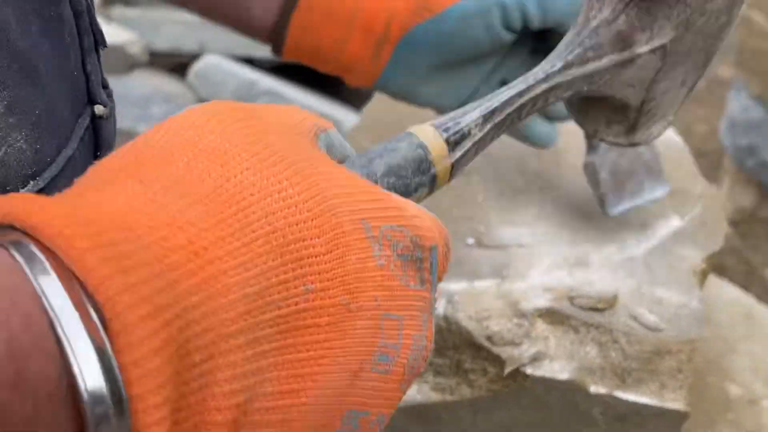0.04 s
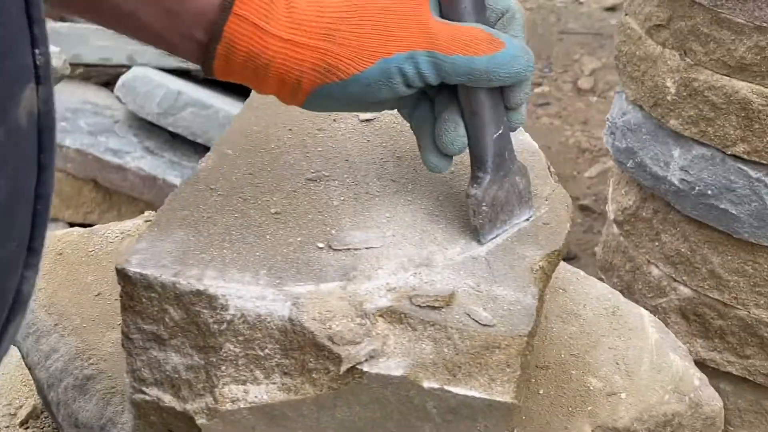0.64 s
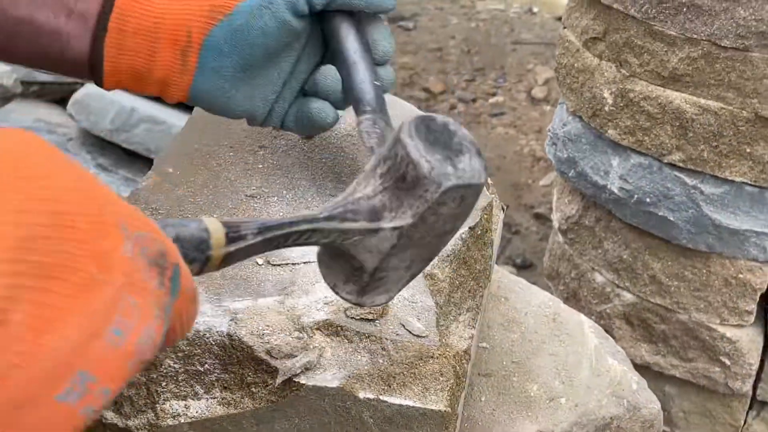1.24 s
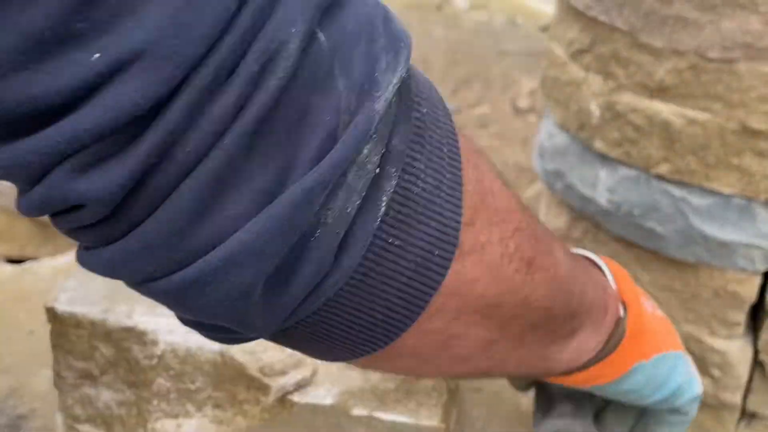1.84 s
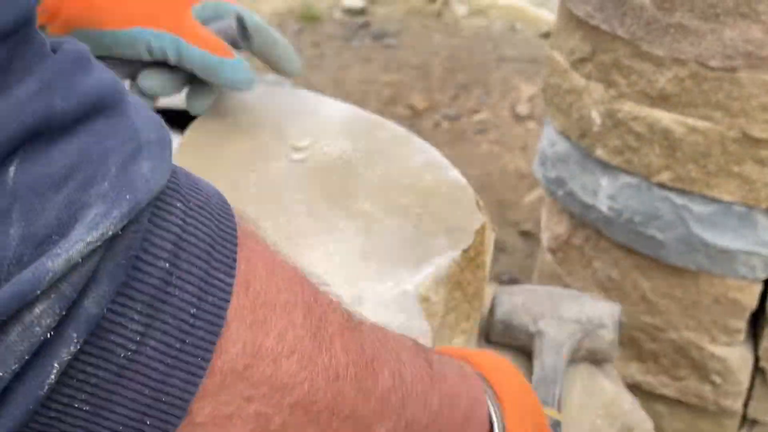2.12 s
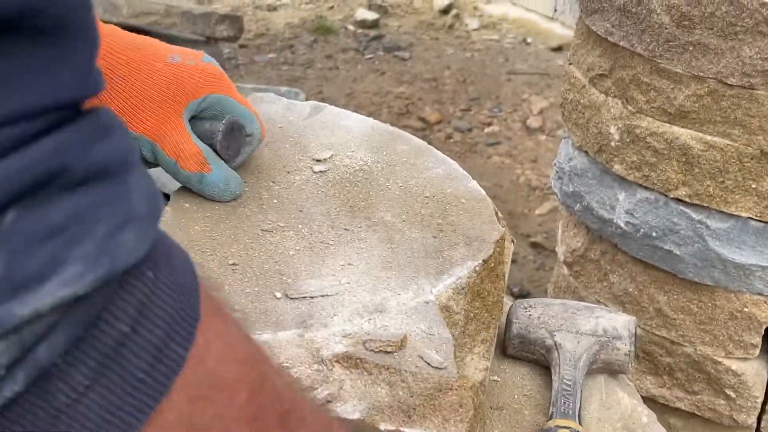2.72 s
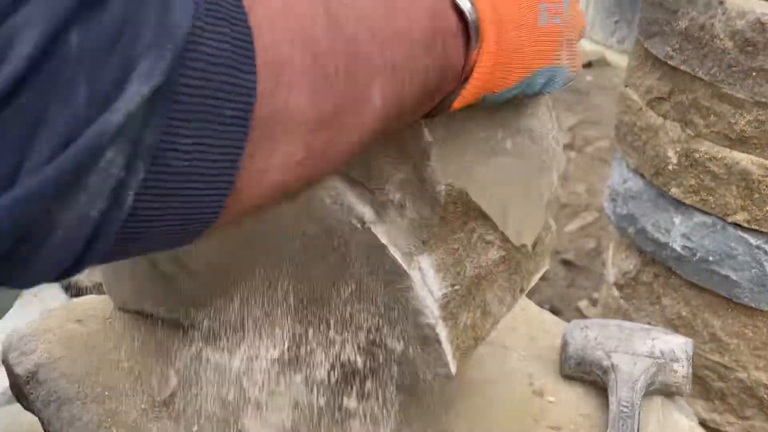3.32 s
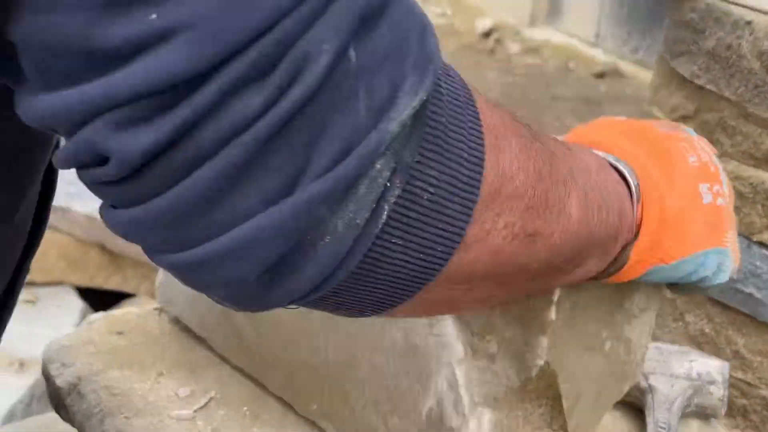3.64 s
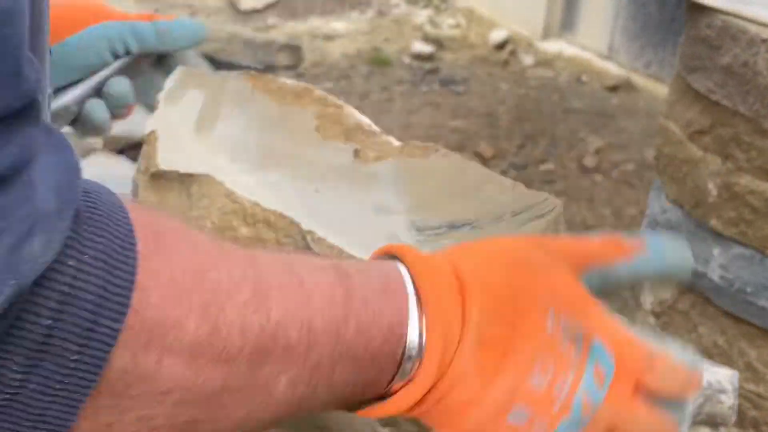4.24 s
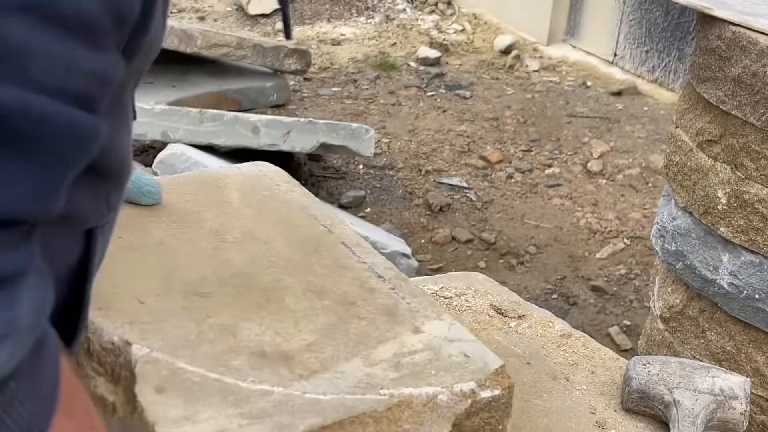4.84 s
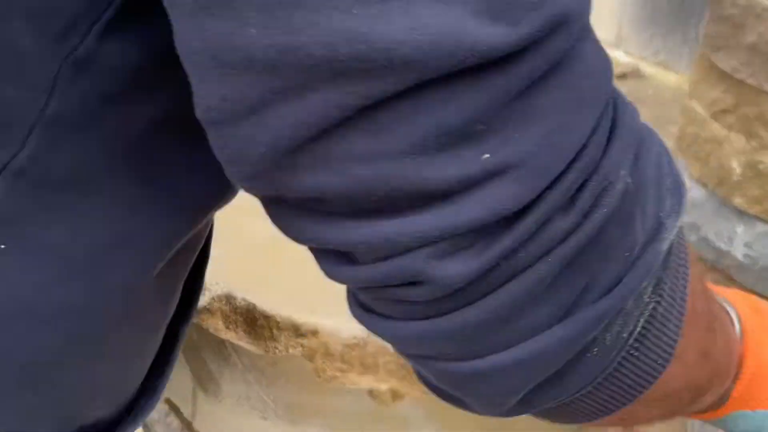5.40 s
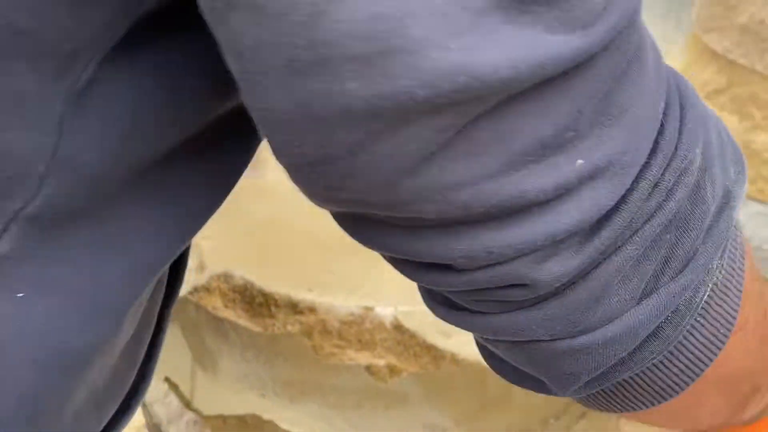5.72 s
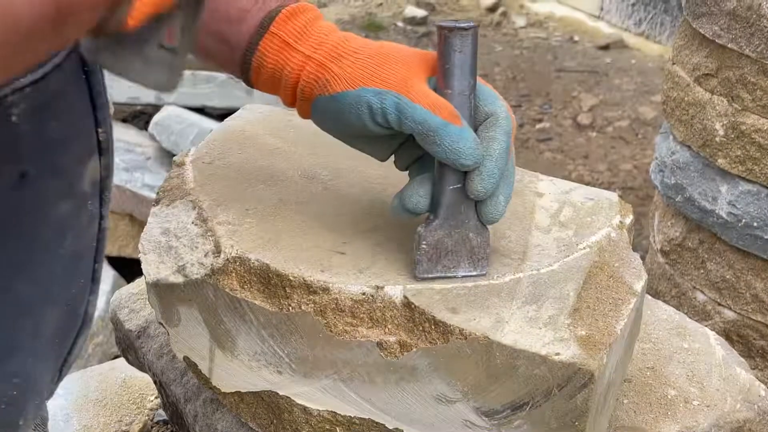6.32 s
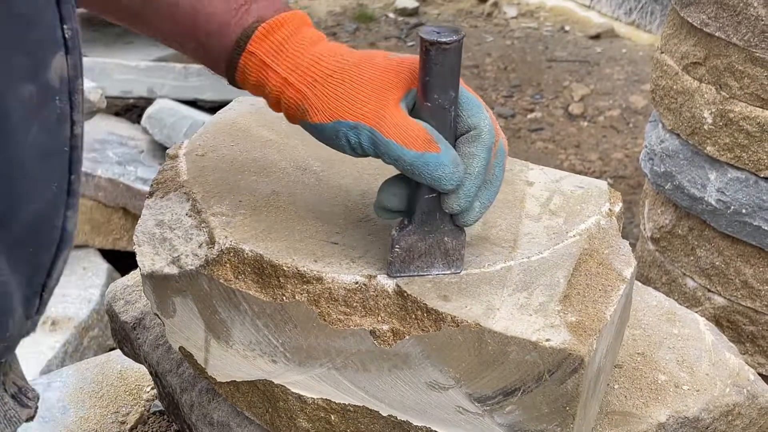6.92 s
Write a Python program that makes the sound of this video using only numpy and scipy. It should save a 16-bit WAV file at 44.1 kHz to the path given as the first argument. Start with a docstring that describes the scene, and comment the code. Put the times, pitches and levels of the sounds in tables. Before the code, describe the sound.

A hammer hits a steel chisel on stone with a sharp, ringing crack. Tools clink, tap and skid over the surface, then a heavy stone block grinds, tips and lands twice with hard clacks and thuds, shedding grit. A few light clinks lead to a second hammer blow at the end. Sleeves rustle faintly over a low hum. It is all heard close up in an open yard.

```python
"""Two hard hammer blows on a steel chisel, as a mason works a sandstone block close by in an open yard.
Each impact cracks, thuds through the stone and sets the steel ringing in its natural modes. Between the
blows the tools clink, tap and skid by stick-slip friction, and the block grinds, tips over, lands on the
stone below and sheds grit. Sleeves rustle and a faint low hum hangs in the air. A faint hollow note
rings on after every knock and scrape, and the yard scatters a short tail."""
import sys
import numpy as np
from scipy import signal
from scipy.fft import rfft, irfft, next_fast_len
from scipy.io import wavfile
from scipy.ndimage import uniform_filter1d, map_coordinates

SR = 44100
rng = np.random.default_rng(int(sys.argv[2]) if len(sys.argv) > 2 else 0)


def transcribe(signal):
    """Save signal, clipped to [-1, 1], as a 16-bit WAV file at the path in sys.argv[1]."""
    frames = np.atleast_2d(signal).T
    limited = np.clip(frames, -1, 1)
    pcm = np.round(limited * 32767).astype(np.int16)
    wavfile.write(sys.argv[1], SR, pcm)


N = 315756
T = np.arange(SR * 6 // 10) / SR  # time within one event, in seconds


def amp(db):
    """Amplitude ratio of a level in decibels."""
    return 10 ** (np.asarray(db) / 20)

def unit(x):
    """Normalisation to rms 1."""
    return x / np.sqrt(np.mean(x ** 2) + 1e-20)

def crest(x):
    """Normalisation of the loudest 6 ms to rms 1."""
    return x / np.sqrt(uniform_filter1d(x ** 2, size=256).max() + 1e-20)

def along(points, hz):
    """Interpolation of (frequency, value) points on a logarithmic frequency axis."""
    freqs, values = np.transpose(points)
    return np.interp(np.log(hz + 1), np.log(freqs + 1), values)

def curves(rows):
    """Linear interpolation in time: one value per sample for each column after the first."""
    times, *columns = np.transpose(rows)
    return [np.interp(np.arange(N) / SR, times, column) for column in columns]

def wobble(rate, n=N):
    """Smooth random modulation through rate knots a second."""
    return map_coordinates(rng.standard_normal(int(n * rate / SR) + 4), [np.arange(n) * rate / SR])

def add(track, start, x):
    """Superposition of x on the track, from start in seconds."""
    part = track[max(round(start * SR), 0):][:len(x)]
    part += x[:len(part)]

def coloured(x, spectrum):
    """Minimum-phase filtering: folding the cepstrum makes the given spectrum causal."""
    size = 2 * next_fast_len(len(x) // 2 + 2048)
    cepstrum = irfft(np.log(amp(along(spectrum, np.fft.rfftfreq(size, 1 / SR)))))
    cepstrum[1:size // 2] *= 2
    cepstrum[size // 2 + 1:] = 0
    return irfft(rfft(x, size) * np.exp(rfft(cepstrum)))[:len(x)]

def held(rise, length, t60):
    """Sustained excitation: a rise, a hold until length, then a fall of 60 dB every t60 seconds."""
    return (1 - np.exp(-T / rise)) * amp(-60 * np.maximum(T - length, 0) / t60)

def fade(rise, t60):
    """Free decay: a quick rise and an exponential fall."""
    return held(rise, 0, t60)

def burst(spectrum, rise, t60):
    """Impact noise: a broadband transient dying away in the given spectrum."""
    return crest(coloured(rng.choice([-1, 1], len(T)) * fade(rise, t60), spectrum))

def modes(table):
    """Modal vibration: damped sines whose strength and pitch vary a little with every strike."""
    ring = 0
    for hz, db, t60 in table:
        gain = amp(db + rng.normal(0, 3.2))
        cycles = hz * rng.normal(1, 0.006) * T + rng.random()
        ring = ring + gain * np.sin(2 * np.pi * cycles) * fade(0.00071, t60)
    return crest(ring)

def grains(n, rate, spread_db):
    """Shot noise: grains snap at random moments, rate a second, with scattered sizes."""
    size = amp(spread_db * np.clip(rng.standard_normal(n), -2, 2))
    return unit((rng.random(n) < rate / SR) * rng.choice([-1, 1], n) * size)

# Spectra of grinding stone, running sand and snapping grit. Each row: frequency in Hz, level in dB.
GRIND_SPECTRUM = [(150, -17.5), (360, -3.5), (560, 3.5), (780, 2.5), (1050, -2), (1380, 0.5), (1900, -8),
                  (4000, -11.5), (8000, -33), (13000, -59.5)]
SAND_SPECTRUM = [(500, -17.5), (2000, -5.5), (5000, -4.5), (7500, -1.5), (9200, 2.5), (10300, -14),
                 (11700, -11.5), (12800, -41), (16000, -55)]
TICK_SPECTRUM = [(600, -15), (1800, -3), (3200, -0.5), (5500, -5), (9300, -2), (10800, -23), (13000, -37.5),
                 (15500, -49.5)]
# The block is slid about. Each row: time in seconds, relative levels of grinding and of sand in dB.
SLIDING_LEVELS = [(0.0, -74.5, -69.5), (0.58, -87.5, -87.5), (0.9, -82, -77.5), (1.02, -79, -72),
                  (2.33, -71, -77.5), (2.91, -80, -80), (3.25, -70.5, -73.5), (3.67, -58.5, -71.5),
                  (4.15, -71, -79), (4.44, -72, -80), (4.61, -61.5, -71), (5.12, -69.5, -65.5),
                  (5.24, -70.5, -81.5), (5.56, -70.5, -77.5), (6.0, -77.5, -75.5), (6.66, -84, -83),
                  (7.0, -69.5, -74.5), (7.16, -63.5, -64)]
# The hands pause. Each row: centre and half length in seconds, changes in grinding and in sand in dB.
PAUSES = [(0.754, 0.073, -6, -5), (1.855, 0.037, -1.5, -6), (2.257, 0.042, -3, 0.5),
          (2.849, 0.042, -2, -14), (3.43, .05, -2, -3), (4.09, .04, -2, -4), (4.298, .09, -1.5, -3.5),
          (5.01, 0.071, -8, -3), (5.446, .035, -3, -4), (5.666, 0.046, -1, -6.5), (6.516, 0.035, 0.5, -4.5)]
def sliding_block():
    """Sliding friction: the block grinds on its bed in small jerks while sand and crumbs trickle."""
    grind_db, sand_db = curves(SLIDING_LEVELS)
    for centre, half_length, grind_change_db, sand_change_db in PAUSES:
        still = np.exp(-((np.arange(N) / SR - centre) / half_length) ** 4)
        grind_db += grind_change_db * still
        sand_db += sand_change_db * still
    jerk = wobble(35)
    grind = unit(coloured(grains(N, rate=810, spread_db=0.5), GRIND_SPECTRUM))
    trickle = grains(N, rate=1700, spread_db=11.5) + 0.75 * rng.standard_normal(N)
    falls = grains(N, rate=27, spread_db=3.0)
    crumbs = signal.fftconvolve(falls, burst(TICK_SPECTRUM, rise=.0002, t60=0.0083))[:N]
    sand = unit(coloured(trickle, SAND_SPECTRUM)) + amp(-9.5) * unit(crumbs)
    return amp(grind_db - 1.5 + 2.5 * jerk) * grind + amp(sand_db + 1.5 + 1.6 * jerk) * sand

# Arm movement. Each row: time in seconds, relative level of the rustle in dB.
ARM_LEVELS = [(0.0, -82.5), (0.68, -81.5), (0.98, -73), (2.89, -89), (3.71, -67), (4.19, -79), (4.59, -70),
              (5.14, -81), (5.36, -67.5), (5.58, -73.5), (5.94, -68), (6.4, -73.5), (6.94, -74),
              (7.16, -59.5)]
# Spectrum of rubbing cloth. Each row: frequency in Hz, level in dB.
CLOTH_SPECTRUM = [(20, -14.5), (45, -4.5), (90, 5.5), (200, -2.5), (300, 0.5), (450, -8), (800, -12),
                  (2000, -42.5), (10000, -76)]
def sleeves():
    """Friction noise of cloth: it follows the arms and fluctuates as the sleeves fold."""
    folds_db = 3.5 * wobble(21)
    rustle = unit(coloured(rng.standard_normal(N), CLOTH_SPECTRUM))
    return amp(curves(ARM_LEVELS)[0] + 2 + folds_db) * rustle

# The distant hum. Each row: time in seconds, relative level in dB.
HUM_LEVELS = [(0.0, -87), (1.06, -74), (2.87, -83), (4.67, -68), (5.3, -81.5), (5.84, -63.5), (6.14, -77),
              (6.86, -78), (7.16, -63)]
def hum(hz):
    """Slow modulation of frequency and amplitude makes a faint low tone waver."""
    phase = np.cumsum(hz * (1 + 0.023 * wobble(2.9))) / SR
    return amp(curves(HUM_LEVELS)[0] + 5.5 + 1.9 * wobble(2.6)) * np.sin(2 * np.pi * phase)

# Modes of the hammer head, in close pairs. Each row: frequency in Hz, relative level in dB.
HAMMER_MODES = [(3974, -3), (4005, -4.5), (10400, -15), (10434, -20), (14660, -38), (14800, -42)]
def hammer(tilt_db, partner_db):
    """Beating: paired modes interfere, less and less evenly. partner_db weights each upper mode."""
    ring = 0
    for k, (hz, mode_db) in enumerate(HAMMER_MODES):
        drift = 6 * T * wobble(17, len(T))
        db = mode_db + tilt_db * np.log2(hz / HAMMER_MODES[0][0]) + partner_db * (k % 2)
        ring = ring + amp(db) * np.sin(2 * np.pi * hz * T + drift)
    return ring * amp(6.0 + 1.2 * wobble(55, len(T)))

# The head sings. Each row: start and t60 in seconds, relative level in dB, tilt in dB per octave.
HAMMER_CONTACTS = [(0.0, 0.6, -71, -14), (0.123, .42, -60, -10), (0.87, 0.13, -19, 1.5),
                   (6.239, 0.34, -72, 8), (6.998, 0.14, -41.5, 13)]
# It swells. Each row: start and length in seconds, relative level in dB, tilt in dB per octave.
HAMMER_LIFTS = [(0.91, .05, -55, 11.5), (1.06, 0.17, -63, -3), (5.318, .06, -70.5, -9),
                (6.331, 0.067, -59, -4)]
def hammer_rings():
    """Free vibration: the head rings after a contact and swells as it rebounds or is lifted close."""
    out = np.zeros(N)
    for start, t60, db, tilt_db in HAMMER_CONTACTS:
        add(out, start, amp(db) * hammer(tilt_db, partner_db=-1.5) * fade(.0015, t60))
    for start, length, db, tilt_db in HAMMER_LIFTS:
        swell = held(rise=.025, length=length, t60=0.25)
        add(out, start, amp(db - 6.5) * hammer(tilt_db, partner_db=-11.5) * swell)
    return out

# Spectrum of a rasped stone face. Each row: frequency in Hz, level in dB.
RASP_SPECTRUM = [(200, -7.5), (800, -6), (1600, -1), (2600, -7), (3800, -6.5), (7000, -20), (13000, -53)]
def grit(rasp_db):
    """Granular friction: the same tiny impacts make the sand hiss and the face under it rasp."""
    snaps = grains(len(T), rate=3500, spread_db=2.0)
    return unit(coloured(snaps, SAND_SPECTRUM)) + amp(rasp_db) * unit(coloured(snaps, RASP_SPECTRUM))

# Gritty strokes. Each row: start and length in seconds, level in dB, rasp in dB relative to the sand.
SCRAPE_STROKES = [(0.037, 0.027, -67, -26), (1.057, 0.092, -66.5, -6), (1.308, 0.009, -43, -6.5),
                  (1.3383, .014, -49.5, -9), (1.391, 0.025, -59, -9.5), (1.539, 0.0061, -61.5, 0.5),
                  (2.127, 0.037, -56.5, -1.5), (2.371, 0.041, -64, -4), (2.474, 0.021, -63, 1.5),
                  (2.567, 0.024, -73, 9.5), (2.945, .05, -71, -5), (3.221, 0.11, -56, -2.5),
                  (3.283, .025, -52, 1), (3.513, 0.022, -56.5, 1), (3.548, 0.047, -51.5, 6),
                  (3.672, 0.04, -55.5, -0.5), (3.915, 0.015, -65.5, -1), (4.161, .008, -67.5, 2),
                  (4.706, 0.039, -59.5, -19), (5.173, 0.057, -51, 1.5), (5.492, 0.032, -67.5, -9),
                  (5.595, 0.02, -64, -5.5), (5.833, 0.044, -60.5, 4.5), (6.053, 0.069, -67, -9)]
def scrapes():
    """Abrasion: short strokes catch with a snap and drag sand across the stone."""
    out = np.zeros(N)
    for start, length, db, rasp_db in SCRAPE_STROKES:
        add(out, start, amp(db) * held(.00085, length / 2, 3 * length) * grit(rasp_db))
        add(out, start + 0.0012, amp(db - 2.0) * burst(TICK_SPECTRUM, rise=0.00019, t60=0.012))
    return out

# The chisel's three bending modes. Each entry: frequency in Hz.
CHISEL_MODES_HZ = [3500, 7012, 8412]
DRAG_MODES_DB, BLOW_MODES_DB = [-5, -2.5, -2.5], [0, -11.5, -1.5]  # mode strengths: drawn, struck
def chisel(levels_db, envelope):
    """Bending vibration of a bar: the edge rubs on stone, unsettling each mode in level and phase."""
    ring = 0
    for hz, db in zip(CHISEL_MODES_HZ, levels_db):
        phase = 2 * np.pi * (hz * T + rng.random()) + 0.36 * wobble(130, len(T))
        flutter_db = 2.2 * wobble(90, len(T))
        ring = ring + amp(db + flutter_db) * np.sqrt(2) * np.sin(phase)
    return ring * envelope

# The chisel clinks. Each row: start in seconds, levels of the first, second and third mode in dB.
CLINKS = [(0.123, -60, -46, -47.5), (0.157, -71, -53, -51), (0.458, -81, -76, -79),
          (0.605, -67.5, -64.5, -78), (1.459, -56, -62, -58), (4.446, -54, -79, -67),
          (4.477, -55.5, -85, -64), (5.943, -57, -88.5, -61), (6.242, -59, -54, -62)]
# Its edge is drawn over the stone. Each row: start and length in seconds, relative level in dB.
EDGE_DRAGS = [(0.248, 0.043, -65.5), (1.063, 0.076, -70), (5.982, 0.051, -72.5), (6.309, 0.098, -71.5)]
def chisel_rings():
    """Damped resonance: tapped or drawn, the chisel rings as long as the gloved grip lets it."""
    out = np.zeros(N)
    for start, *levels_db in CLINKS:
        add(out, start, chisel(levels_db, fade(rise=.002, t60=.125)))
    for start, length, db in EDGE_DRAGS:
        add(out, start, amp(db) * chisel(DRAG_MODES_DB, held(rise=0.0086, length=length, t60=.15)))
    return out

# Modes of the stacked stones. Each row: frequency in Hz, level in dB, t60 in seconds.
STACK_MODES = [(160, -12, .11), (214, -3, .13), (302, 0, .125), (390, -12, .08), (515, -6, .1),
               (615, -5, .09)]
# Spectrum of their rumble. Each row: frequency in Hz, level in dB.
THUD_SPECTRUM = [(40, -32.5), (100, -11.5), (200, -1), (320, 4), (600, -0.5), (1000, -15), (2000, -44.5),
                 (8000, -100)]
def thud(noise_db, t60):
    """Low modes of a heavy body: the stacked stones rock over a dull rumble."""
    return crest(modes(STACK_MODES) + amp(noise_db) * burst(THUD_SPECTRUM, rise=0.0024, t60=t60))

# Spectrum of a hollow contact. Each row: frequency as a multiple of the pitch, level in dB.
HOLLOW_SHAPE = [(.12, -31.5), (.35, -15), (.68, -5.5), (1, 2), (1.2, -3.5), (1.5, -17.5), (2.6, -20.5),
                (6, -41.5), (14, -74)]
def hollow(hz):
    """A broad resonance: the spectrum of a contact, peaking at its pitch."""
    return [(hz * ratio, db) for ratio, db in HOLLOW_SHAPE]

# Tools tap on stone. Each row: start in seconds, relative level in dB, offsets of the thud and of the
# tick in dB, pitch in Hz.
TOOL_TAPS = [(0.123, -26, -29, -24, 1690), (0.235, -56, -11, -5, 1310), (1.459, -40, -16.5, -24, 1320),
             (1.611, -54, -27, 2, 2210), (1.727, -26, -19, -26.5, 1360), (1.742, -15.5, -24, -19, 1270),
             (1.903, -36, -19, 9.5, 1370), (2.038, -51.5, -7.5, -16, 1350),
             (2.361, -36, -20.5, -12.5, 1190), (2.683, -44, -23.5, -15, 1300),
             (2.706, -50.5, -16.5, -10.5, 1400), (2.775, -51.5, -20, -19, 1400),
             (4.213, -50.5, -15, -10, 1734), (4.445, -46.5, -19, -12, 3080), (4.465, -49, -21, -3, 1470),
             (4.921, -40.5, -34, -16, 2403), (6.242, -39, -12, -19, 1246), (6.458, -50, -7, -27, 2120)]
def taps():
    """Light impact: a hollow clack, a little thud and a tick of crushed grit."""
    out = np.zeros(N)
    for start, db, thud_db, tick_db, hz in TOOL_TAPS:
        add(out, start, amp(db - 10) * burst(hollow(hz), rise=.0007, t60=.017))
        settling = burst(hollow(hz), rise=0.00091, t60=0.078)
        add(out, start + 0.0028, amp(db - 25.0) * settling)
        add(out, start + 0.0011, amp(db + thud_db - 5.0) * thud(noise_db=-3, t60=0.14))
        add(out, start, amp(db + tick_db - 6.5) * burst(TICK_SPECTRUM, rise=0.000067, t60=0.0087))
    return out

# Spectra of steel on steel, struck stone and the pushed ground. Each row: frequency in Hz, level in dB.
CRACK_SPECTRUM = [(300, -26.5), (1200, -8.5), (1900, -4.5), (2800, -5), (3900, 2.5), (4900, -9),
                  (6700, -4.5), (7900, -8), (9100, 3), (10300, -9.5), (11300, -18.5), (13000, -23.5),
                  (16000, -25.5)]
CLACK_SPECTRUM = [(150, -27.5), (450, -1.5), (750, 0.5), (1100, -7), (1380, -1.5), (1750, -18.5),
                  (2600, -29), (5000, -52), (12000, -90)]
PUSH_SPECTRUM = [(20, -16.5), (50, -3), (110, 2.5), (200, -1), (400, -21), (1000, -49), (5000, -100)]
# Hammer on chisel. Each row: start in seconds, levels of crack, clack, thud, ground push and pinned
# chisel in dB, t60 of the pinned chisel in seconds, level of the chisel once it bounces free in dB.
HAMMER_BLOWS = [(0.8712, -18.5, -31.5, -33.5, -30, -15.5, .014, -37.5),
                (6.9978, -14, -21.5, -19.5, -21.5, -22.5, 0.047, -51)]
def blows():
    """Momentum transfer: steel cracks on steel, the edge bites, and the block pushes into the ground."""
    out = np.zeros(N)
    for start, crack_db, clack_db, thud_db, push_db, pinned_db, pinned_t60, free_db in HAMMER_BLOWS:
        add(out, start, amp(crack_db) * burst(CRACK_SPECTRUM, rise=0.00038, t60=0.012))
        crumbling = burst(TICK_SPECTRUM, rise=0.0025, t60=.085)
        add(out, start, amp(crack_db - 15.5) * crumbling)
        add(out, start + .0008, amp(clack_db) * burst(CLACK_SPECTRUM, rise=.0005, t60=.05))
        add(out, start + 0.0023, amp(thud_db) * thud(noise_db=1, t60=0.065))
        jolt = burst(THUD_SPECTRUM, rise=.0006, t60=.03)
        add(out, start + .001, amp(thud_db + 0.5) * jolt)
        add(out, start + 0.0012, amp(push_db) * burst(PUSH_SPECTRUM, rise=0.0045, t60=0.035))
        add(out, start + 0.0011, amp(pinned_db) * chisel(BLOW_MODES_DB, fade(.0004, pinned_t60)))
        add(out, start + 0.0043, amp(free_db) * chisel(DRAG_MODES_DB, fade(.002, 0.28)))
    return out

def spills():
    """Granular flow: each blow and landing shakes grit loose, more after a heavier thud."""
    out = np.zeros(N)
    thuds = [(start, thud_db) for start, _, _, thud_db, *_ in HAMMER_BLOWS]
    thuds += [(start, thud_db) for start, _, thud_db, *_ in BLOCK_LANDINGS]
    for start, thud_db in thuds:
        add(out, start, amp(-46 + 0.38 * thud_db) * fade(rise=0.03, t60=0.49) * grit(rasp_db=-2.5))
    return out

# The steel edge squeaks. Each row: start in seconds, level in dB, pitch in Hz.
EDGE_SQUEAKS = [(1.309, -43, 2610), (2.131, -57, 2800), (2.147, -48.5, 2724)]
def squeaks():
    """Friction-excited oscillation: a thin, brief tone, unsteady in pitch and level."""
    out = np.zeros(N)
    for start, db, hz in EDGE_SQUEAKS:
        phase = np.cumsum(hz * (1 + 0.11 * wobble(735, len(T)))) / SR
        tone = np.sin(2 * np.pi * phase) * amp(1.6 * wobble(580, len(T)))
        add(out, start, amp(db) * crest(tone * fade(0.0011, 0.052)))
    return out

# Gloves, boots and the block scuff and bump. Each row: start in seconds, level in dB, pitch in Hz.
SOFT_BUMPS = [(1.313, -48.5, 227), (3.634, -45.5, 493), (4.45, -57, 604), (4.722, -59, 1300),
              (4.769, -61, 1240), (5.245, -45.5, 453), (5.533, -56, 86), (5.624, -57, 543),
              (5.698, -56, 97), (5.755, -61, 551), (5.785, -60, 600), (5.835, -54, 554),
              (5.851, -55.5, 78.6), (6.042, -58, 532), (6.435, -58.5, 167)]
def bumps():
    """Soft contact: friction noise swells and dies in a narrow band."""
    out = np.zeros(N)
    for start, db, hz in SOFT_BUMPS:
        add(out, start, amp(db) * burst(hollow(hz), rise=0.004, t60=0.086))
    return out

# Spectrum of a chattering tool. Each row: frequency in Hz, level in dB.
CHATTER_SPECTRUM = [(200, -19), (800, -7), (1400, -1), (2400, -1.5), (3800, -1), (5600, 0.5), (7500, -13),
                    (9300, -7), (11000, -29), (15500, -46)]
# A tool skids. Each row: start and length in seconds, first and last rate in slips a second, level in
# dB, change of level over the skid in dB.
TOOL_SKIDS = [(1.901, .095, 420, 200, -43, -21), (2.037, .048, 200, 240, -48, -10.5)]
def skids():
    """Stick-slip motion: a tool crosses the stone in a fast, uneven train of like clicks."""
    out = np.zeros(N)
    for start, length, first_rate, last_rate, db, fade_db in TOOL_SKIDS:
        progress = T / length
        rate = np.interp(progress, [0, 1], [first_rate, last_rate]) * np.exp(.1 * wobble(120, len(T)))
        slips = np.diff(np.floor(np.cumsum(rate) / SR), prepend=-1)
        slips *= amp(3.0 * rng.standard_normal(len(T)))
        click_decay = amp(-60 * T / 0.021)
        alike = signal.fftconvolve(slips, click_decay * rng.standard_normal(len(T)))[:len(T)]
        rough = signal.fftconvolve(slips, click_decay)[:len(T)] * rng.standard_normal(len(T))
        chatter = unit(coloured(alike + .5 * rough, CHATTER_SPECTRUM))
        release_db = -60 * np.maximum(T - length, 0) / 0.037
        add(out, start, chatter * amp(db + fade_db * progress + release_db))
    return out

def crunch(length):
    """Roughness noise: stone faces grind while they touch, then quickly fall silent."""
    touch = held(rise=0.00042, length=length, t60=0.0076)
    return crest(coloured(rng.choice([-1, 1], len(T)) * touch, CLACK_SPECTRUM))

# The block's own modes. Each row: frequency in Hz, level in dB, t60 in seconds.
BLOCK_MODES = [(516, -2, .08), (755, 0, .06), (945, -6, .05), (1105, -10, .03), (1390, -2, .035)]
# The tipped block lands and rocks. Each row: time in seconds, levels of clack, thud and ground push in
# dB, tilt of the clack's middle octaves in dB per octave.
BLOCK_LANDINGS = [(3.1665, -28, -29, -66.5, -1.5), (3.181, -39, -41.5, -70, 3), (3.52, -46, -35.5, -66, 1),
                  (3.545, -14, -20, -35, 0), (3.609, -33.5, -45, -51.5, 0), (4.012, -48, -54, -75, -4),
                  (5.1929, -15.5, -26.5, -50.5, 1.5), (5.234, -40, -39.5, -73, -0.5)]
def landings():
    """Inelastic impact: the block slides, crunches onto its bed, rings briefly and shakes the stack."""
    out = np.zeros(N)
    for start, clack_db, thud_db, push_db, tilt_db in BLOCK_LANDINGS:
        slide = np.exp((T - T[-1]) / 0.11) * grit(rasp_db=-3)  # sand gives way just before the landing
        add(out, start - T[-1], amp(-63 + 0.13 * clack_db) * slide)
        clack = crunch(length=.005) + amp(-3.5) * modes(BLOCK_MODES)
        add(out, start, amp(clack_db) * crest(coloured(clack, [(500, -tilt_db), (2000, tilt_db)])))
        add(out, start + 0.0017, amp(thud_db) * thud(noise_db=-3.0, t60=0.12))
        add(out, start + 0.0025, amp(push_db) * burst(hollow(hz=143), rise=.004, t60=0.08))
        crushed_grit = burst(TICK_SPECTRUM, rise=0.00014, t60=0.038)
        add(out, start, amp(-39.5 + 0.41 * clack_db) * crushed_grit)
    return out

def stone_faces(x):
    """Comb filtering: nearby stone faces return eight weak copies within a few milliseconds."""
    response = np.zeros(SR // 80)
    response[rng.integers(SR // 1000, len(response), size=8)] = 0.18 * rng.choice([-1, 1], size=8)
    response[0] = 1
    return signal.fftconvolve(x, response / np.linalg.norm(response))[:N]

def lingering_low_note(x, hz, t60):
    """Damped resonance: a faint hollow note rings on after every knock and scrape."""
    decay = amp(-60 * T / t60)
    return signal.fftconvolve(x, 2 * decay * np.cos(2 * np.pi * hz * T) / decay.sum())[:N]

# Stereo difference in quadrature. Each row: frequency in Hz, level relative to the centre in dB.
QUADRATURE_SIDE = [(60, -14), (280, -16), (700, -11), (1300, -12), (3300, -11), (5700, -17), (7200, -19.5),
                   (8400, -10.5), (9400, 5), (10500, 12), (12000, 0.5), (15000, -4)]
# Stereo balance. Each row: frequency in Hz, left minus right in dB before the quadrature part is added.
BALANCE = [(120, 0.34), (300, 0.67), (700, -2), (1400, -2.5), (2600, 0.5), (6000, -0.5)]
def microphone_pair(x):
    """Phase difference: two close ports hear alike in the bass, nearly opposite in the high treble."""
    size = next_fast_len(N + SR // 2)
    hz = np.fft.rfftfreq(size, 1 / SR)
    lean = amp(along(BALANCE, hz))
    side_gain = (lean - 1) / (lean + 1) + 1j * amp(along(QUADRATURE_SIDE, hz))
    side = irfft(rfft(x, size) * side_gain, size)[:N]
    return np.array([x + side, x - side])

# Reverberation time of the yard. Each row: frequency in Hz, t60 in seconds.
YARD_T60 = [(100, 0.15), (400, 0.92), (1500, 0.48), (5000, 0.25), (12000, 0.13)]
def yard(x):
    """Diffuse scattering: stones and ground return a short tail, different in each channel."""
    hz, t, noise = signal.stft(rng.standard_normal((2, SR // 2)), SR, nperseg=256)
    tail = signal.istft(noise * amp(-60 * t / along(YARD_T60, hz)[:, None]), SR, nperseg=256)[1]
    delayed = np.pad(x, (round(0.0094 * SR), 0))
    return signal.fftconvolve(delayed[None], tail / np.linalg.norm(tail[0]), axes=1)[:, :N]

def scene():
    """Superposition: the direct sounds, the lingering low note and the yard's reflections add."""
    hits = blows() + hammer_rings() + chisel_rings() + taps() + landings()
    hits += skids() + bumps() + squeaks() + stone_faces(scrapes())
    gritty = stone_faces(sliding_block() + spills())
    low_note = lingering_low_note(amp(-13) * hits + amp(1) * gritty, hz=305, t60=.55)
    near = hits + gritty + low_note + stone_faces(sleeves()) + hum(hz=64)
    return microphone_pair(near) + amp(-31) * yard(hits) + amp(-19) * yard(gritty)

def record(dry):
    """Soft saturation rounds the very highest peaks, and a low-pass filter limits the band."""
    ceiling, cutoff_hz = .85, 16000
    rounded = dry / (1 + np.abs(dry / ceiling) ** 6) ** (1 / 6)
    size = next_fast_len(N + SR // 2)
    passband = np.clip((cutoff_hz - np.fft.rfftfreq(size, 1 / SR)) / 800 + .5, 0, 1)
    return irfft(rfft(rounded, size) * passband, size)[:, :N]

dry = scene()
out = record(dry)
transcribe(out)
```